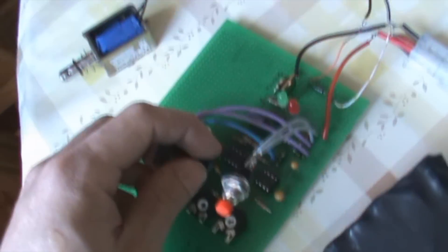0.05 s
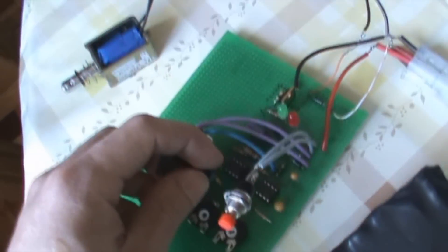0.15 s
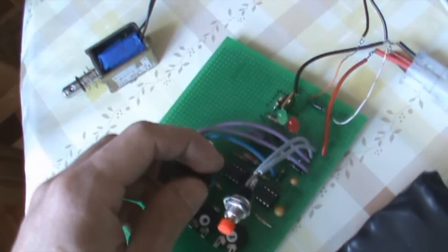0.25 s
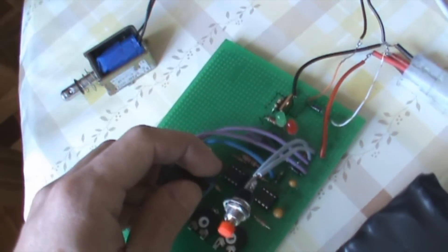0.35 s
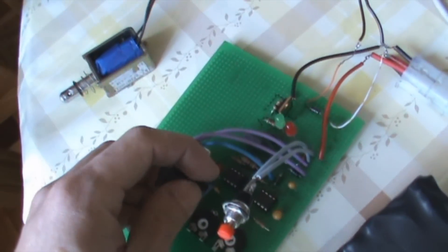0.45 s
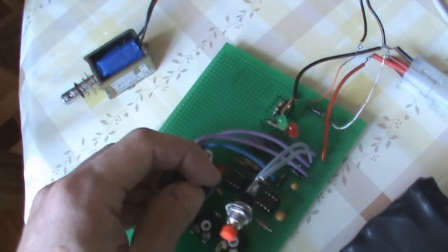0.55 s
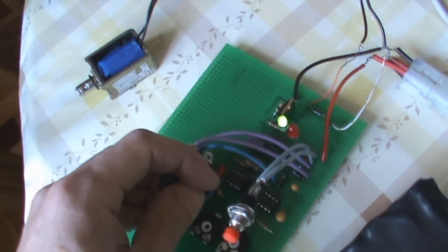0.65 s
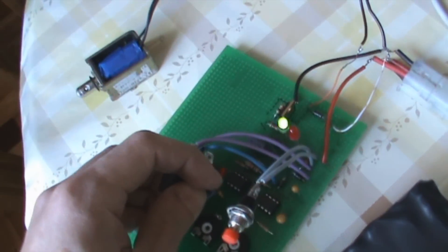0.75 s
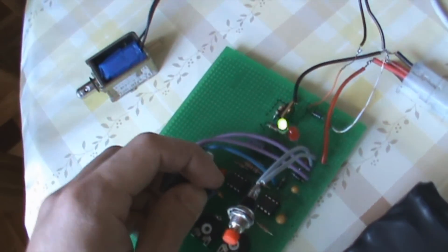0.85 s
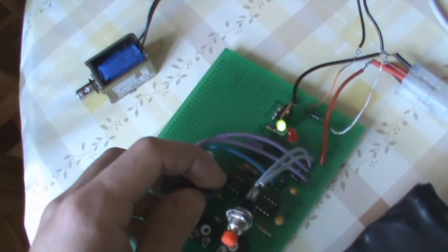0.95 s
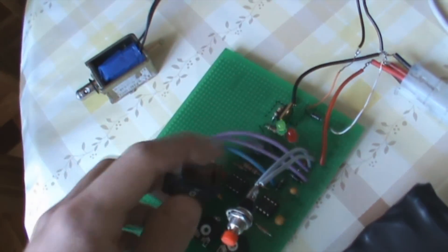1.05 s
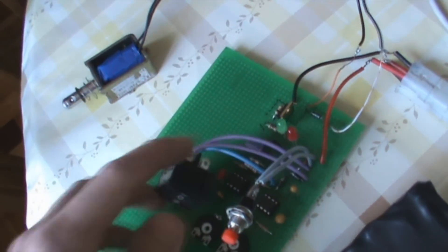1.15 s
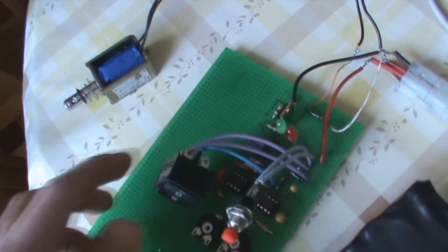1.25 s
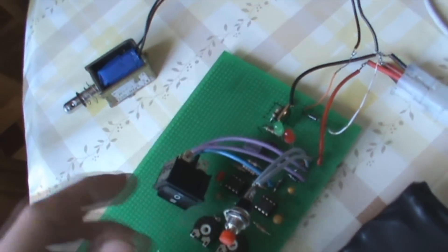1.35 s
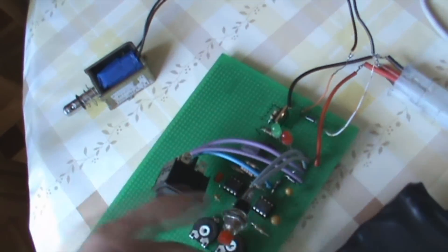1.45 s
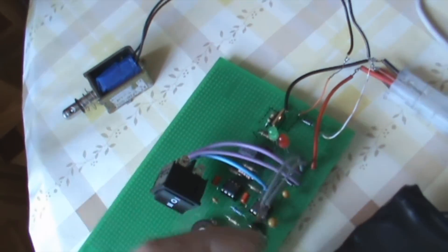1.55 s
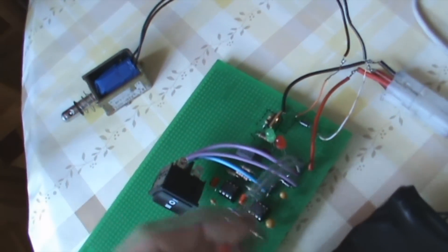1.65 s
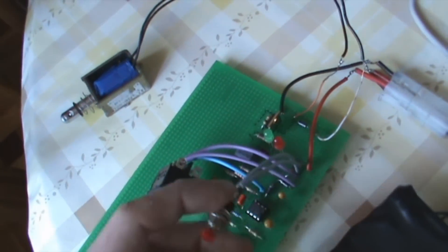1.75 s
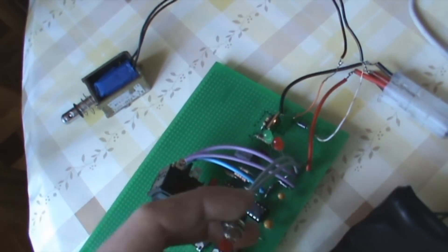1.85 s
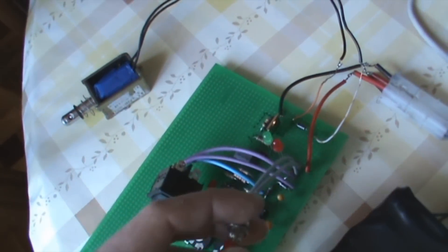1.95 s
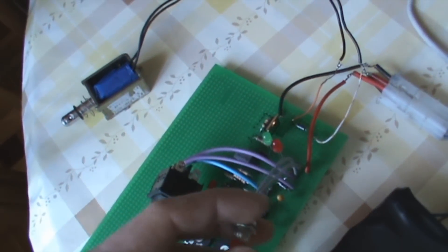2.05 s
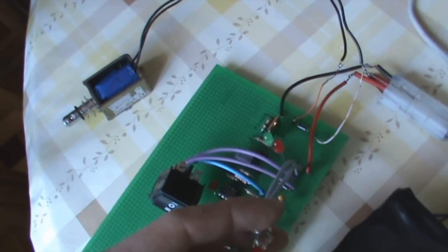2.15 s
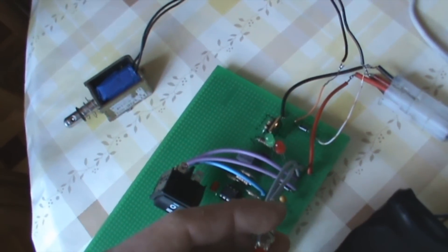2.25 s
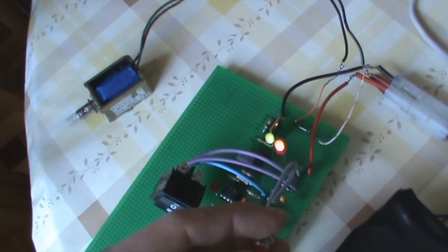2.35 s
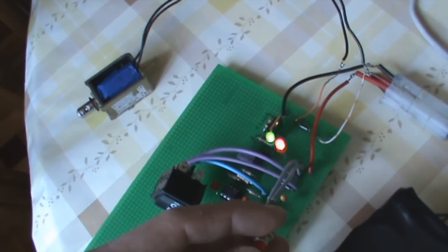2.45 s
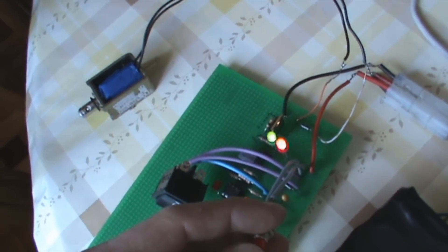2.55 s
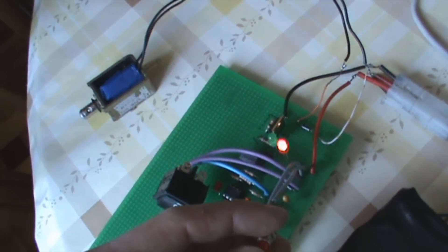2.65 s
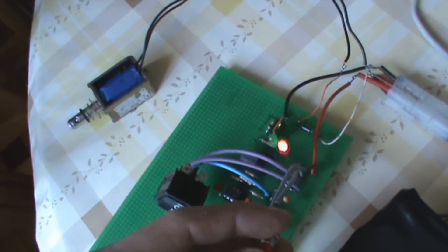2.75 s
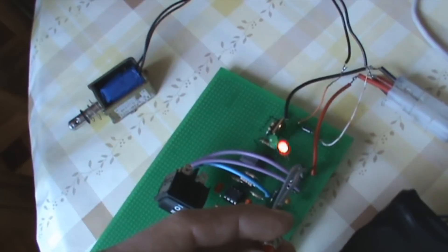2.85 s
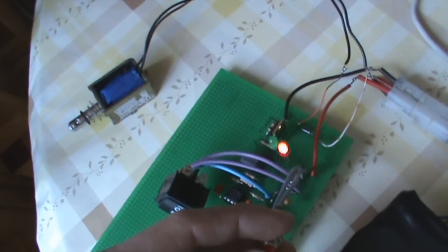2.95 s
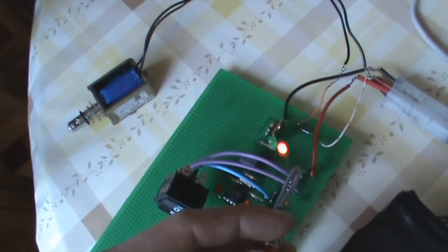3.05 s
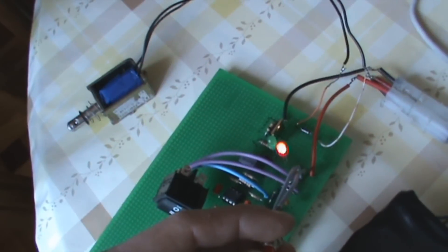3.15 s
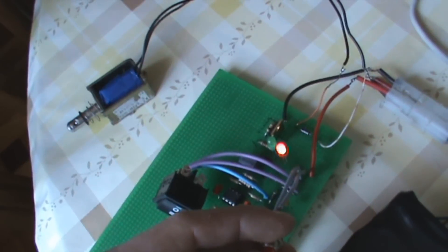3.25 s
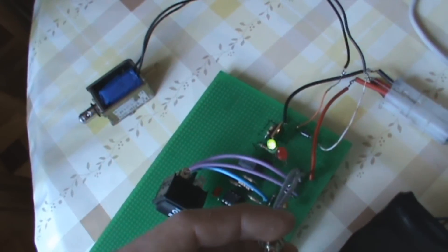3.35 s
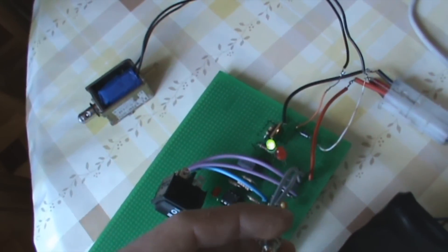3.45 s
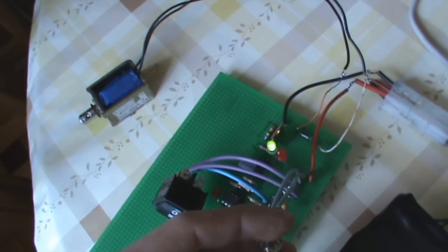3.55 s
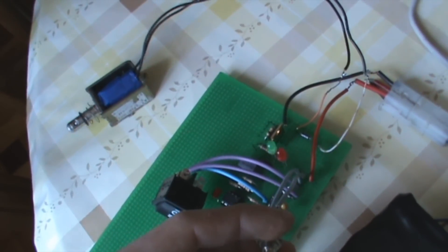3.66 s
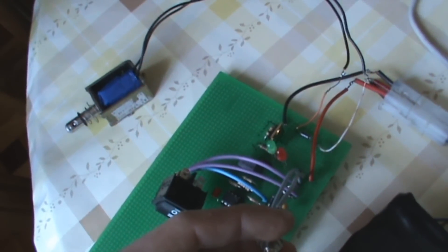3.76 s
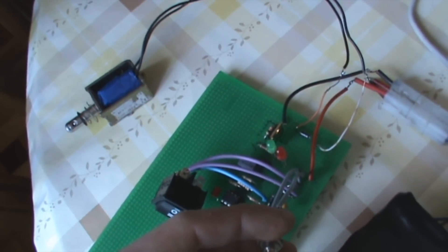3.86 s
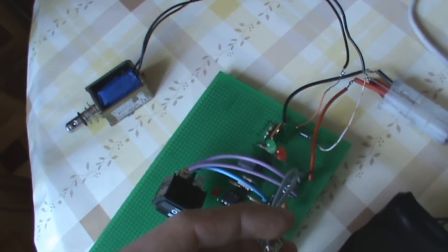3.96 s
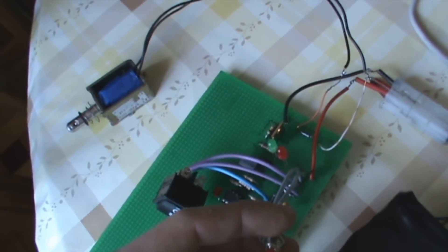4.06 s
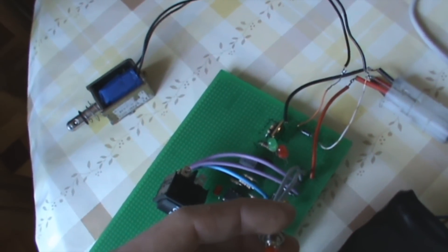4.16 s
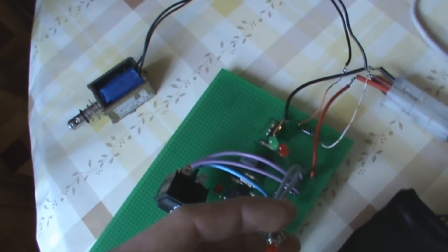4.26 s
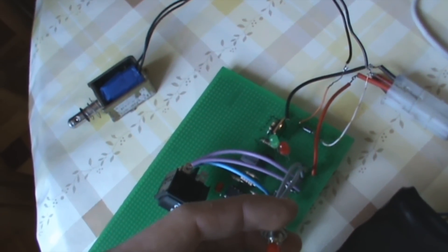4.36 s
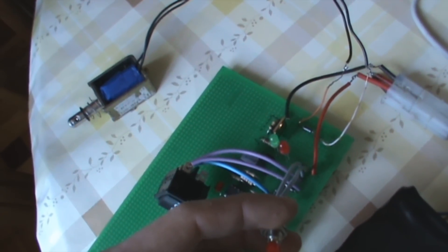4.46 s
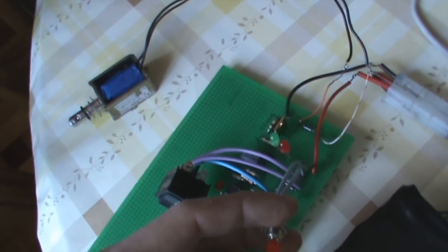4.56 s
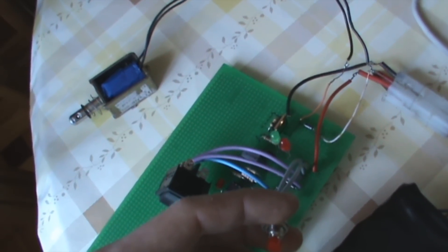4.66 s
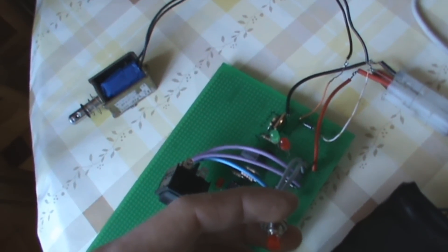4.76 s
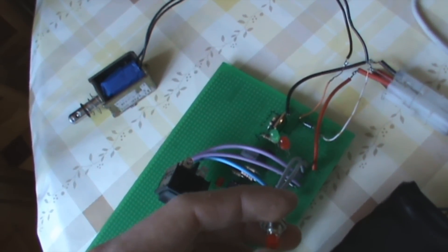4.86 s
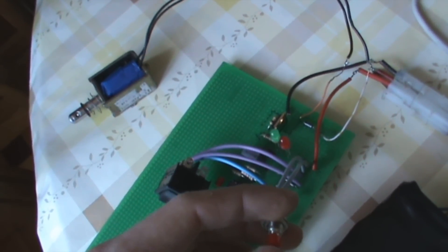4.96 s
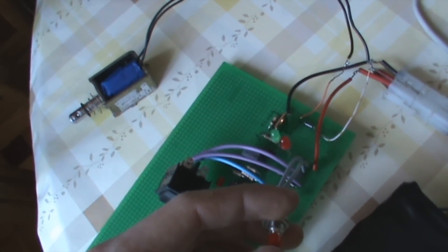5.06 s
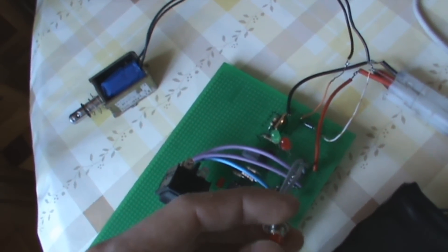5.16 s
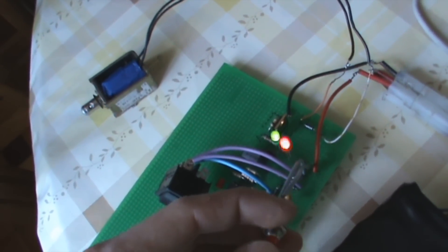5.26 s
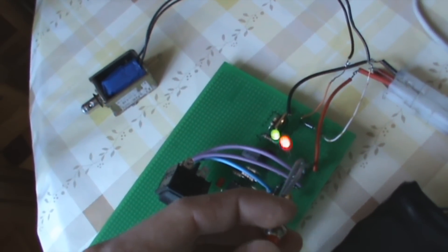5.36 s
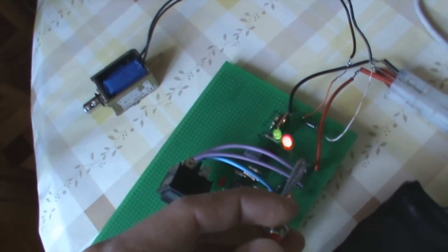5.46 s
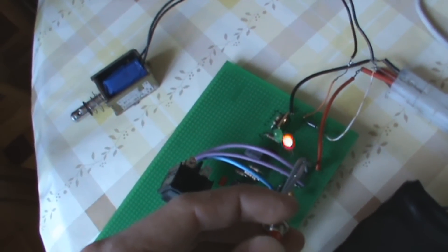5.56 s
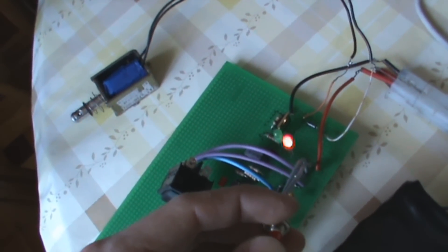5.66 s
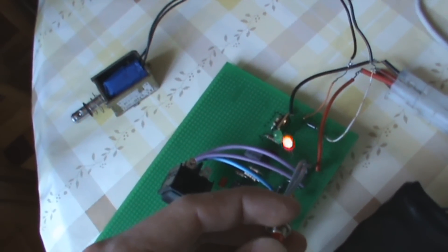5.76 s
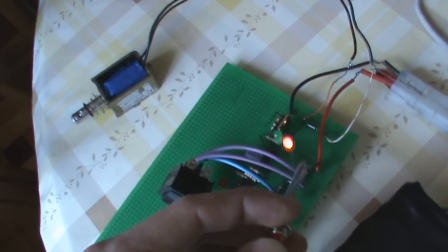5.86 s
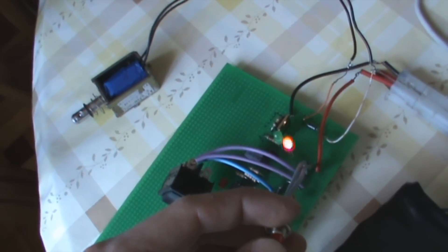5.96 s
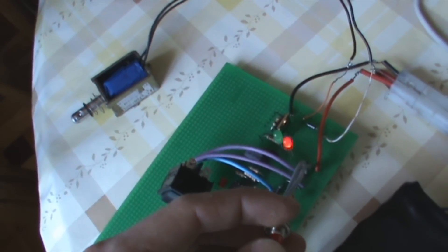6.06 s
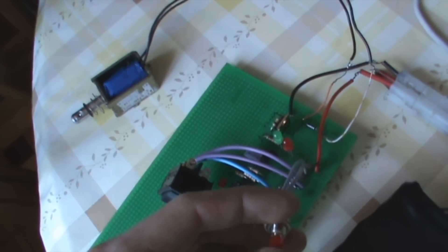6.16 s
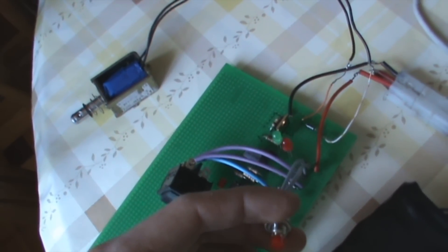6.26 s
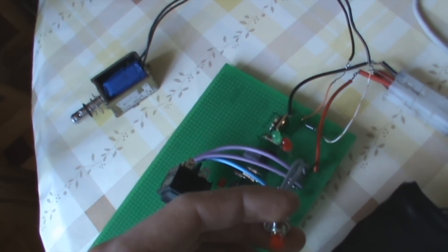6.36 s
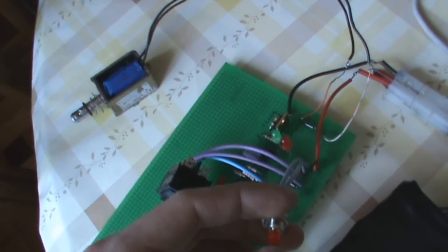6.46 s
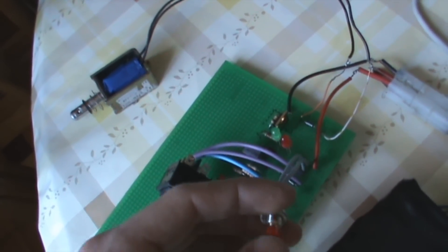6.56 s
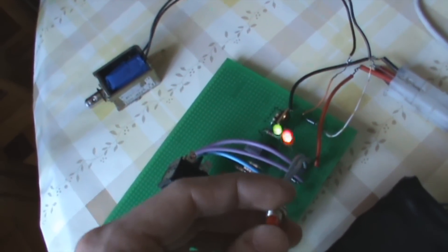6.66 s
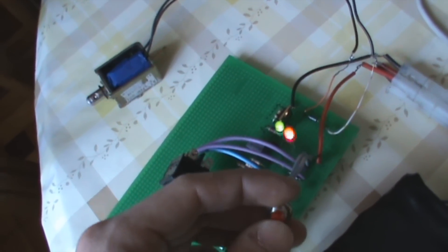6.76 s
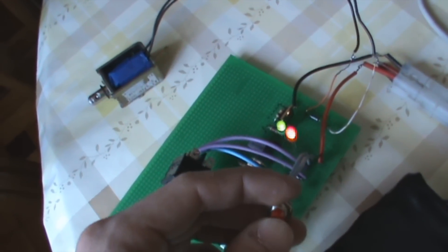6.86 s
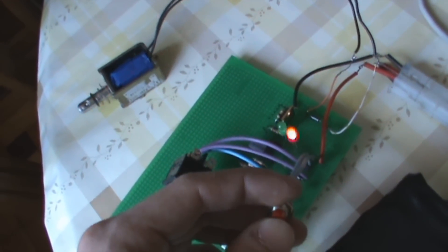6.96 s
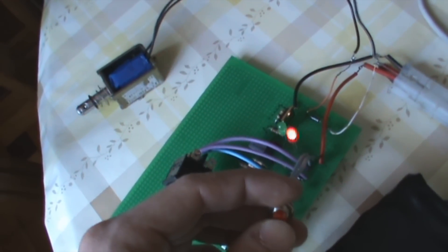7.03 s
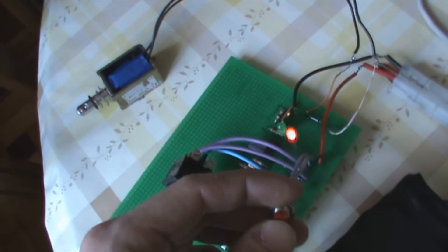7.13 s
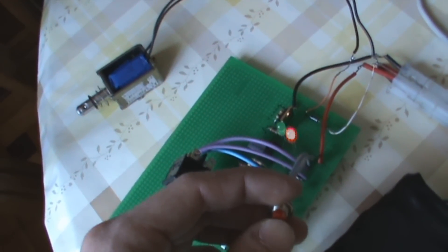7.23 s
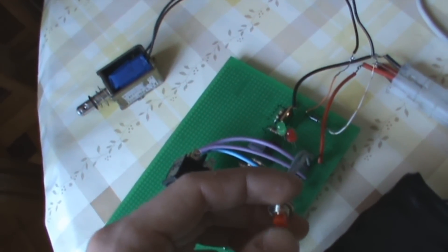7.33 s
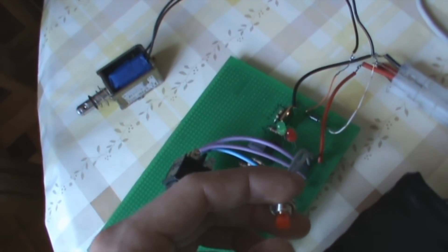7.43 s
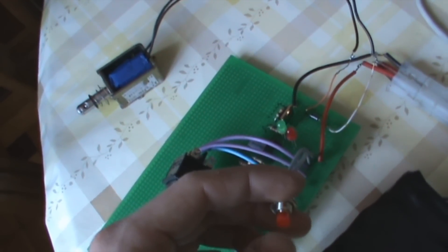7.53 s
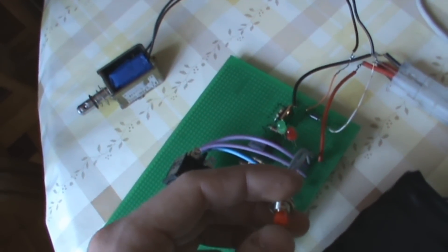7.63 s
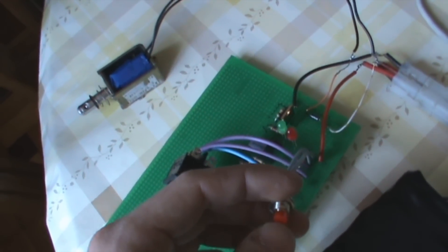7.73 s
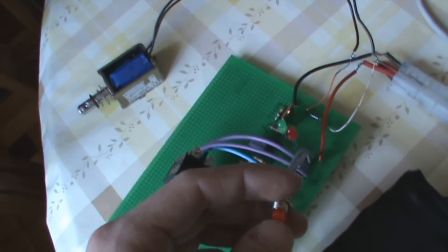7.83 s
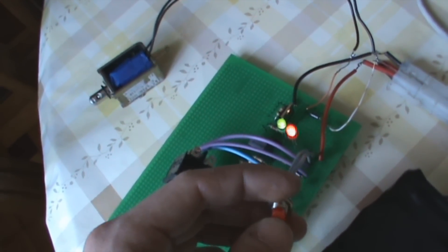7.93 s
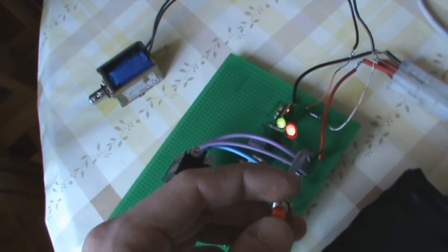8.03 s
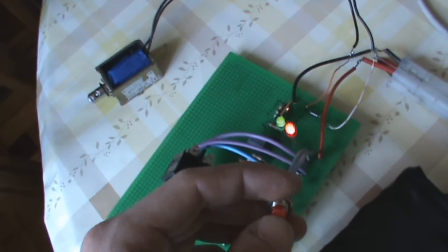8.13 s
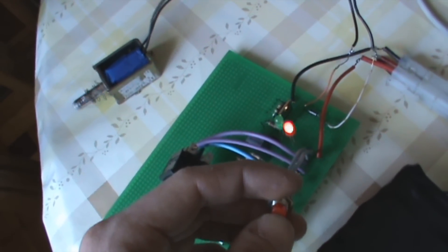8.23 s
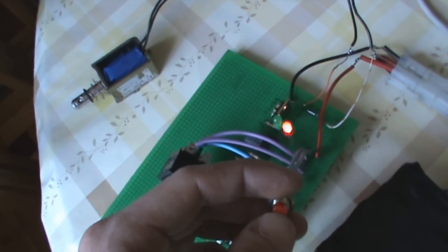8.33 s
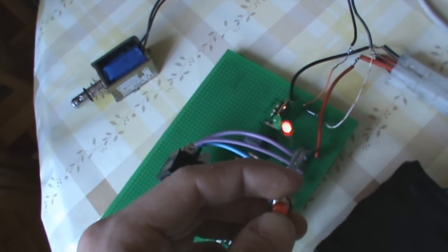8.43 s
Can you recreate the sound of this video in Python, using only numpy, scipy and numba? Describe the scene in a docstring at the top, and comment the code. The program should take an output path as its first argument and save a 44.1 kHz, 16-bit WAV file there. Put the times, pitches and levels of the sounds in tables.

```python
"""A quiet house hisses and rumbles while a handheld camera ticks and hums. A rocker switch snaps at 0.1 s
and 0.7 s, and a hard-walled room answers. Then a timer circuit works a small solenoid on a table six
times: its electromagnet pulls a plunger in with a clack that rings the steel frame, and a spring throws
it back out. In between, a finger clicks a push button and faint pips come and go. The camera turns its
gain down on each loud blow. The last release comes at 8.3 s."""
import sys
import numpy as np
from scipy import signal
from scipy.fft import rfft, irfft, next_fast_len
from scipy.io import wavfile
from numba import njit

SR = 44100
rng = np.random.default_rng(int(sys.argv[2]) if len(sys.argv) > 2 else 0)


def transcribe(signal):
    """Save signal, clipped to [-1, 1], as a 16-bit WAV file at the path in sys.argv[1]."""
    frames = np.atleast_2d(signal).T
    limited = np.clip(frames, -1, 1)
    pcm = np.round(limited * 32767).astype(np.int16)
    wavfile.write(sys.argv[1], SR, pcm)


N = 374409

# Levels are relative. fade_s is the time to die away by 60 dB.
# side_db is how strong the left-right difference is, next to what both sides share.
AIR_TONE = [(15, -21.5), (28, -3.5), (40, -19), (58, -2), (80, -7.5), (120, -6.5), (200, -11), (350, -10),
            (1000, -15.5), (1290, -22.5), (2000, -24.5), (3700, -31), (6000, -32.5), (16000, -34.5)]  # house noise and microphone hiss: pitch_hz, level_db
AIR_WIDTH = [(60, -25.5), (290, -9), (640, -6.5), (1400, 0.5), (4000, 1.5), (7000, -3), (15000, -12)]  # stereo width of that noise: pitch_hz, side_db
BASS_SWELL = [(0, -1), (6.6, -0.5), (7.2, 3), (7.6, 2), (8.5, 1)]  # the rumble grows and eases: time_s, level_db
HUM_SWELL = [(0, -73.5), (1.3, -66), (2.2, -69), (3.6, -60.5), (4.4, -64), (6.5, -64.5), (7.25, -53),
             (7.85, -57), (8.49, -62.5)]  # the lower hum grows and eases: time_s, level_db
ROCKER_SNAPS = [(0.096, -20, 2600), (0.105, -23, 2300), (0.1088, -9, 2100), (0.1112, -7, 2030),
                (0.7041, 0.5, 2800), (0.7064, -2, 2690)]  # the switch snaps over: start_s, level_db, lever_pitch_hz
ROCKER_CASE = [(1600, 1000, -26.5), (5050, 1800, -6.5), (8040, 1600, -1.5), (10550, 1500, -4.5),
               (12800, 810, -5)]  # tones of its plastic case: pitch_hz, width_hz, level_db
BOARD_TONES = [(2200, 870, -11.5), (7900, 4200, -1)]  # the board under it: pitch_hz, width_hz, level_db
WALL_ECHOES = [(0.015, -27), (0.0229, -18), (0.027, -10), (0.034, -1.5), (0.0391, -13.5), (0.051, -3),
               (.061, -11)]  # echoes off the nearest walls, before fading: delay_s, level_db
ROOM_WIDTH = [(500, -10.5), (2000, -3), (6000, -1.5), (10000, -2.5), (15000, -12)]  # stereo width of the room: pitch_hz, side_db
ROOM_FADE = [(250, 0.4), (1800, 0.57), (4400, 0.45), (7500, 0.41), (10000, 0.35), (14000, 0.14)]  # how long the room rings: pitch_hz, fade_s
PULL_TIMES = [0.7282, 2.4899, 3.4428, 5.33, 6.7596, 8.0076]  # the plunger hits its stop: start_s
PULL_CHATTER = [(-.0195, -35), (-.0087, -31.5), (.0042, -10.5), (.0095, -16.5), (0.0123, -14),
                (0.0174, -15)]  # it knocks in its tube around each hit: offset_s, level_db
# Tones of the steel frame, with the plunger on its stop (seated) or free:
# pitch_hz, seated_db, free_db, free_fade_s
FRAME_TONES = [(1910, -39, -18.5, 0.0064), (3650, -17, -34.5, 0.0072), (4232, -2.5, -7, 0.025),
               (4322, -3.5, -4, 0.029), (4429, -2, 1.5, 0.032), (4650, -1.5, -32.5, 0.015),
               (5205, -16.5, -19, 0.018), (6630, -27.5, -46, 0.018), (6890, -17, -19, 0.015),
               (7597, -13, -23.5, 0.024), (8125, -22.5, -22, 0.02), (9640, -10.5, -23.5, 0.022),
               (9940, -14.5, -12, 0.031), (10266, -13.5, -11.5, 0.029), (10910, -10, -14.5, .015),
               (12050, -18, -32.5, .015), (12550, -26.5, -31, .015)]
RATTLE_TONES = [(2040, 1080, -19), (3297, 1100, -10), (5400, 2760, 2), (9500, 3400, 4), (13380, 2600, -1)]  # the spring and clip rattle: pitch_hz, width_hz, level_db
# The spring throws the plunger out; it lands and bounces once:
# start_s, landing_db, bounce_after_start_s, bounce_db
THROWS = [(1.2446, -38, .035, -18.5), (2.8252, -24, .0295, -24), (3.7800, -29, 0.03, -18.5),
          (5.6652, -26, 0.037, -23), (7.095, -34, 0.027, -18), (8.3436, -16.5, 0.027, -21)]
# The tick of a landing or bounce: pitch_hz, width_hz, level_db
BOUNCE_TONES = [(10900, 790, -9), (6860, 6900, 1.0), (1890, 880, -15)]
TABLE_TONES = [(111, -31, 0.15), (175, -24.5, 0.08), (425, -27.5, .04), (784, -21.5, 0.024)]  # the table top thuds: pitch_hz, level_db, fade_s
BUTTON_CLICKS = [(1.0231, -41), (1.6021, -48), (1.6371, -33), (1.7421, -37), (1.9281, -40), (2.4661, -37),
                 (3.4231, -32), (5.3047, -33), (5.3059, -23), (6.2221, -23.5), (6.2542, -31),
                 (6.7364, -39.5), (7.3974, -19.5), (7.9841, -32)]  # button contacts and finger taps: start_s, level_db
BUTTON_CASE = [(4500, 4000, -10.5), (8900, 2000, -6.5), (10700, 1500, -1.5), (13700, 3600, -3.5)]  # tones of the button: pitch_hz, width_hz, level_db
PIP_RUNS = [(1.585, 1.85, 1996, -57), (2.309, 2.33, 2010, -57), (4.422, 4.6, 1960, -57.5),
            (4.463, 4.63, 3670, -60.5)]  # runs of short pips: start_s, end_s, pitch_hz, level_db


def undb(db):
    """Turn decibels into a number to multiply by."""
    return 10 ** (np.asarray(db) / 20)


def on_log(hz, table):
    """Read between the (pitch_hz, value) rows of a table, giving each octave equal space."""
    pitches, values = np.transpose(table)
    return np.interp(np.log(np.maximum(hz, 1)), np.log(pitches), values)


def ring(tones, rise_s=.00005):
    """A struck thing rings in (pitch_hz, level_db, fade_s) tones; neighbours swing opposite ways."""
    t = np.arange(SR // 4) / SR
    waves = sum((-1) ** k * undb(db) * np.sin(2 * np.pi * hz * t) * 1000. ** (-t / fade_s)
                for k, (hz, db, fade_s) in enumerate(tones))
    return (1 - np.exp(-t / rise_s)) * waves


def strike(events, sound):
    """Play the same sound at every (start_s, level_db) event."""
    out = np.zeros(N + SR)
    for s, db in events:
        out[int(s * SR):int(s * SR) + len(sound)] += undb(db) * sound
    return out[:N]


def clicks(events, body, decay_s, samples=SR // 100):
    """Each contact is a fresh burst of noise that rings a body's (pitch_hz, width_hz, level_db) tones."""
    burst = np.exp(-np.arange(samples) / (decay_s * SR))
    shell = ring([(hz, db, np.log(1000) / (np.pi * width)) for hz, width, db in body])[:SR // 100]
    out = np.zeros(N + SR)
    for s, db in events:
        click = np.convolve(burst * rng.standard_normal(samples), shell)
        out[int(s * SR):int(s * SR) + len(click)] += undb(db) * click / np.abs(click).max()
    return out[:N]


def thin(sound, cutoff_hz=1070):
    """Small parts move too little air to make much bass."""
    return signal.sosfilt(signal.butter(3, cutoff_hz, "high", fs=SR, output="sos"), sound)


def house_air(bass_hz=630):
    """Steady hiss over a swelling rumble that is nearly the same left and right."""
    size = next_fast_len(N)
    t, hz = np.arange(N) / SR, np.fft.rfftfreq(size, 1 / SR)
    mid, side = rfft(rng.standard_normal((2, size)))
    side *= undb(on_log(hz, AIR_WIDTH))
    colour = undb(on_log(hz, AIR_TONE))
    both = np.array([mid + side, mid - side]) * colour * undb(-53.5) / np.std(irfft(mid * colour, size))
    bass_share = 1 / (1 + (hz / bass_hz) ** 2)
    rumble = irfft(both * bass_share, size)[:, :N]
    hiss = irfft(both * (1 - bass_share), size)[:, :N]
    return rumble * undb(np.interp(t, *np.transpose(BASS_SWELL))) + hiss


def camera_hum(low_hz=236.8, high_hz=431, width_hz=9, waver_db=4, waver_s=.11):
    """Two narrow bands of noise hum; the lower one swells and wavers."""
    size = next_fast_len(N)
    t, hz = np.arange(N) / SR, np.fft.rfftfreq(size, 1 / SR)
    hums = []
    for pitch_hz in (low_hz, high_hz):
        band = rfft(rng.standard_normal(size)) / (1 + (2 * (hz - pitch_hz) / width_hz) ** 2)
        hum = irfft(band, size)[:N]
        hums.append(hum / np.std(hum))
    turns = np.arange(0, t[-1] + 1, waver_s)
    waver = waver_db * np.interp(t, turns, rng.standard_normal(len(turns)))
    swell = np.interp(t, *np.transpose(HUM_SWELL))
    return undb(swell + waver) * hums[0] + undb(-74) * hums[1]


def camera_ticks(per_second=25, pitch_hz=3600, width_hz=500):
    """The camera's works tick faintly once a picture, some ticks louder than others."""
    times = np.arange(.024, N / SR, 1 / per_second)
    levels_db = -56 + 2.2 * rng.standard_normal(len(times))
    return clicks(np.c_[times, levels_db], [(pitch_hz, width_hz, 0)], decay_s=.0018)


def rocker_switch(lever_width_hz=450, lever_db=-8):
    """Each snap rings the plastic case and the lever, whose pitch changes from snap to snap."""
    out = np.zeros(N)
    for s, db, lever_hz in ROCKER_SNAPS:
        body = ROCKER_CASE[:1] + [(lever_hz, lever_width_hz, lever_db)] + ROCKER_CASE[1:]
        out += clicks([(s, db)], body, decay_s=.00044)
    return thin(out)


def switch_board():
    """The board under the rocker switch rings on for a moment after each snap."""
    snaps = [(s, db) for s, db, _ in ROCKER_SNAPS]
    return undb(-21.5) * clicks(snaps, BOARD_TONES, decay_s=.011, samples=SR // 20)


def room_echo(length_s=.7, late_count=70, late_gap_s=.0065, build_s=.0091):
    """The walls answer a click with separate echoes over a soft wash; the treble dies first."""
    t, hz = np.arange(SR) / SR, np.arange(SR // 2 + 1)
    time_scatter, level_scatter = rng.standard_normal((late_count, 2)).T
    late_s = .068 + late_gap_s * (np.arange(late_count) + .2 * time_scatter)
    late_db = -9.5 + .5 * level_scatter
    echoes = np.zeros((2, SR))
    for s, db in np.r_[WALL_ECHOES, np.c_[late_s, late_db]]:
        leftward = rng.uniform(-.9, 1.2)  # a few more come from the left
        echoes[:, int(s * SR)] += undb(db) * np.array([1, leftward])
    for lag in (17, 29, 47):  # rough walls smear each echo
        smear = np.r_[1, np.zeros(lag - 1), .5]
        echoes = signal.lfilter(smear[::-1], smear, echoes)
    wash = undb(-32) * rng.standard_normal((2, SR)) * (1 - np.exp(-(t / build_s) ** 2))
    mid, side = rfft(echoes + wash)
    side *= undb(on_log(hz, ROOM_WIDTH))
    both = np.array([mid + side, mid - side])
    pitches, fades = np.transpose(ROOM_FADE)
    out = np.zeros((2, SR))
    for one_band, fade_s in zip(np.eye(len(pitches)), fades):
        band = irfft(both * on_log(hz, np.c_[pitches, one_band]), SR)
        out += band * 1000. ** (-t / fade_s)
    return out[:, :int(length_s * SR)]


def solenoid(contact_s=.0003, seated_fade_share=.56, hiss_s=.022, flight_s=.0172, thud_lag_s=.002):
    """The plunger chatters in and clacks, damping the frame; let go, it lands with a thud and bounces."""
    seated = ring([(hz, db, fade * seated_fade_share) for hz, db, _, fade in FRAME_TONES], contact_s)
    free = ring([(hz, db, fade) for hz, _, db, fade in FRAME_TONES], contact_s)
    pulls = [(s, 4.5) for s in PULL_TIMES]  # start_s, level_db
    releases = [(s, -5.5) for s, *_ in THROWS]
    chatter = np.array([(s + offset, db) for s in PULL_TIMES for offset, db in PULL_CHATTER])
    chatter += [.00043, -1] * rng.standard_normal(chatter.shape)  # scatter in time_s, level_db
    landings = [(s + flight_s, db) for s, db, _, _ in THROWS]
    knocks = landings + [(s + after, db) for s, _, after, db in THROWS]
    frame = strike(pulls, seated) + strike(chatter, seated) + strike(releases + knocks, free)
    hiss_swell = np.linspace(.5, 1, int(hiss_s * SR))  # a faint hiss swells just before each release
    hiss = np.roll(strike(releases, hiss_swell), -len(hiss_swell)) * rng.standard_normal(N)
    lead_in_hiss = undb(-55.5) * signal.oaconvolve(hiss, seated)[:N] + undb(-35) * hiss
    rattle = undb(-14) * clicks(pulls, RATTLE_TONES, decay_s=.018, samples=SR // 12)
    rattle += undb(-13) * clicks(releases, RATTLE_TONES, decay_s=.0056, samples=SR // 12)
    ticks = undb(.5) * clicks(knocks, BOUNCE_TONES, decay_s=.00058)
    thud = strike([(s + thud_lag_s, -17) for s, _ in landings], ring(TABLE_TONES))
    return undb(-2) * (thin(frame + lead_in_hiss + rattle + ticks) + thud)


def push_button():
    """The contacts and the finger make tiny, bright clicks in the plastic."""
    return thin(clicks(BUTTON_CLICKS, BUTTON_CASE, decay_s=.00027))


def camera_pips(gap_s=.08, fade_s=.09):
    """Faint short tones, probably the lens motor, come in runs."""
    return sum(strike([(s, db) for s in np.arange(start, end, gap_s)], ring([(hz, 0, fade_s)]))
               for start, end, hz, db in PIP_RUNS)


def microphone_ports(both, lag_s=.00004, top_hz=5190):
    """The right microphone opening hears low and middle pitches a little after the left."""
    size = next_fast_len(N)
    hz = np.fft.rfftfreq(size, 1 / SR)
    phase = np.pi * hz * lag_s / (1 + (hz / top_hz) ** 4)
    return irfft(rfft(both, size) * np.exp(1j * np.array([phase, -phase])), size)[:, :N]


@njit
def follow_peaks(peaks, rise_s, fall_s):
    """Track how loud the sound is, rising at one speed and falling at another."""
    out, level = np.empty(len(peaks)), 0.
    for i in range(len(peaks)):
        level += (peaks[i] - level) / (SR * (rise_s if peaks[i] > level else fall_s))
        out[i] = level
    return out


def scene():
    """The solenoid sits to the left and the switches ahead, in a room with a faint background."""
    clacks, rocker, button = solenoid(), rocker_switch(), push_button()
    direct = clacks * undb([[1.5], [-1.5]]) + rocker + switch_board() + button
    # The switches are nearer, so less of their sound comes by way of the walls.
    to_walls = clacks + undb(-16) * rocker + undb(-16.5) * button
    echo = signal.oaconvolve(room_echo(), to_walls[None], axes=1)[:, :N]
    return direct + echo + house_air() + camera_hum() + camera_ticks() + camera_pips()


def record(dry):
    """The camera turns loud blows down, so the room seems to swell after them, and cuts the top treble."""
    limit_db, ratio, look_ahead_samples, top_hz = -8.5, 54, 12, 15900
    level = follow_peaks(np.abs(dry).max(axis=0), rise_s=.00015, fall_s=.022)
    gain = np.minimum(1, (undb(limit_db) / (level + 1e-9)) ** (1 - 1 / ratio))
    limited = microphone_ports(dry) * np.roll(gain, -look_ahead_samples)
    return signal.sosfilt(signal.ellip(10, .2, 70, top_hz, fs=SR, output="sos"), limited)


dry = scene()
out = record(dry)
transcribe(out)
```